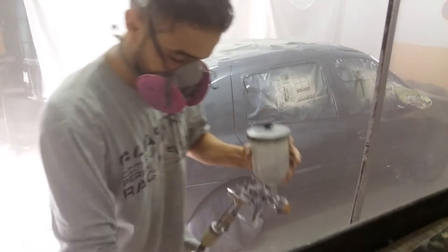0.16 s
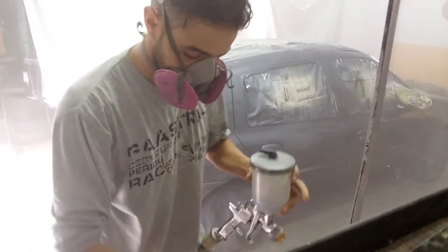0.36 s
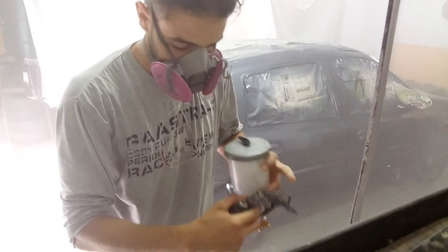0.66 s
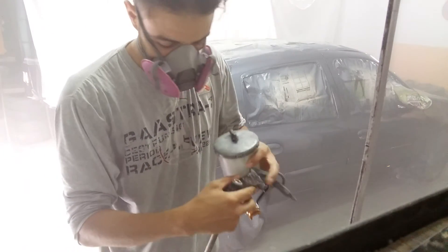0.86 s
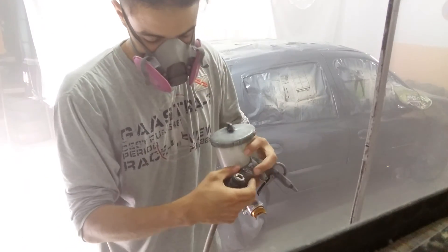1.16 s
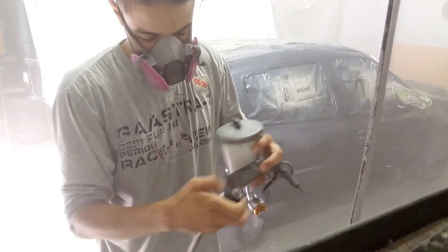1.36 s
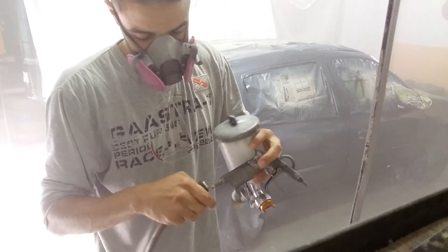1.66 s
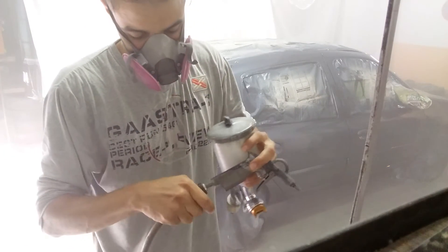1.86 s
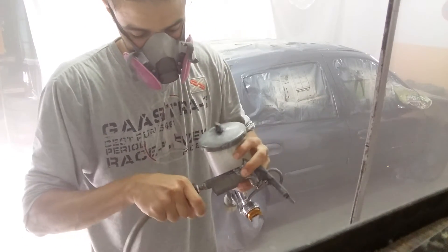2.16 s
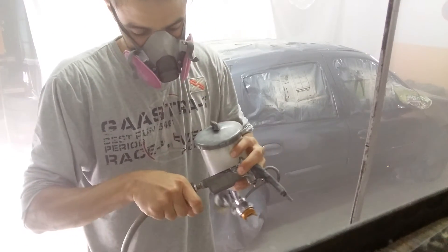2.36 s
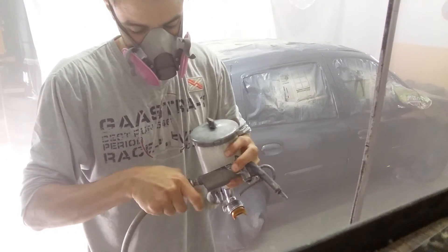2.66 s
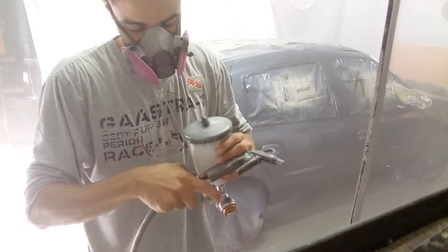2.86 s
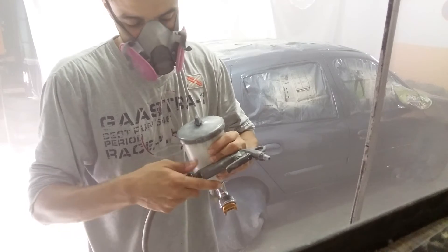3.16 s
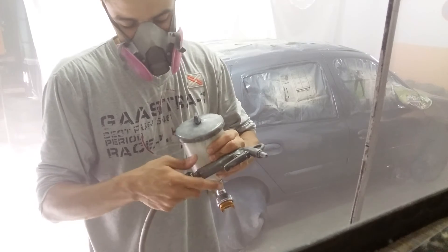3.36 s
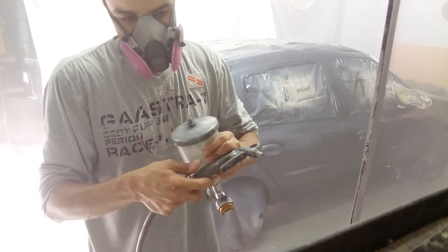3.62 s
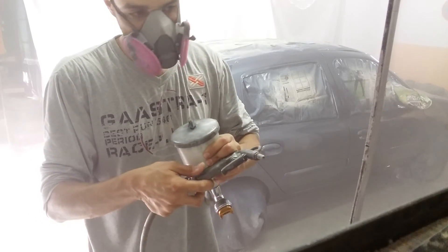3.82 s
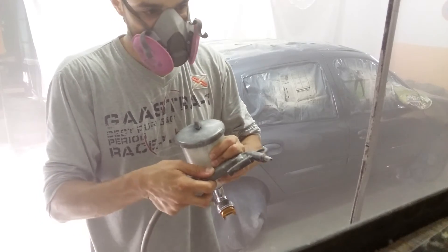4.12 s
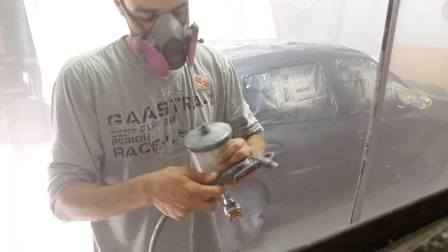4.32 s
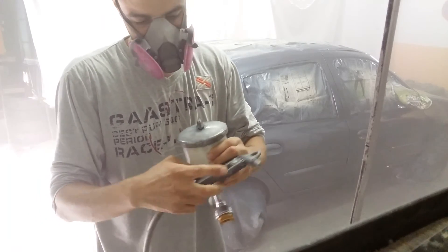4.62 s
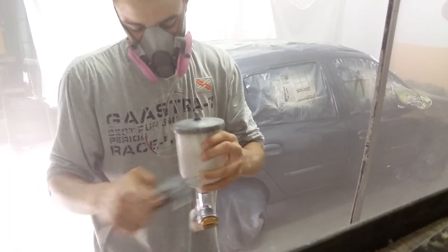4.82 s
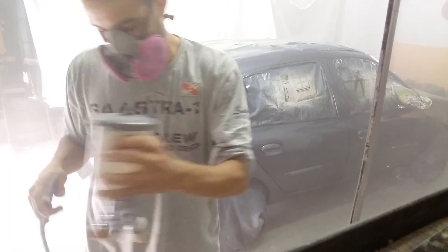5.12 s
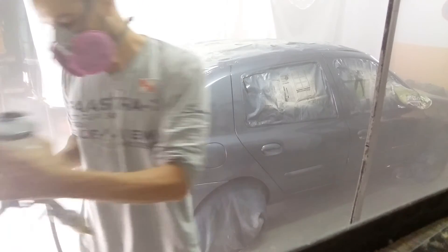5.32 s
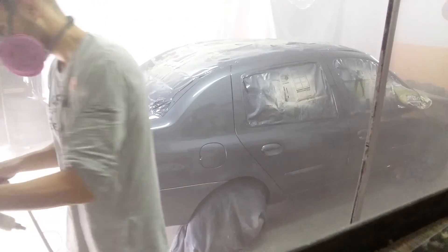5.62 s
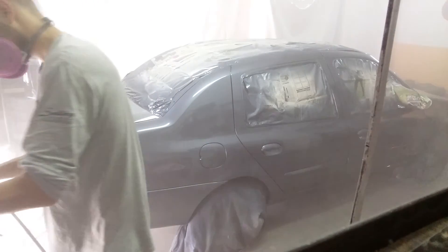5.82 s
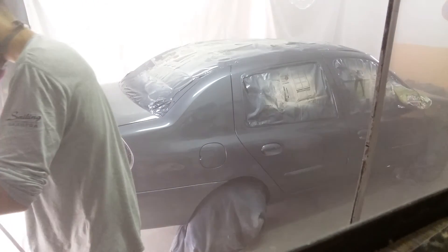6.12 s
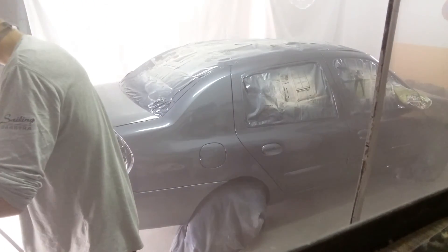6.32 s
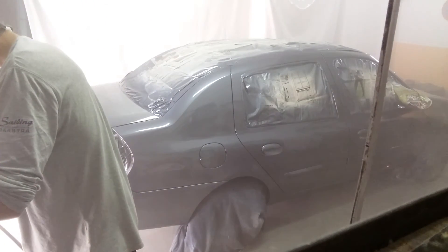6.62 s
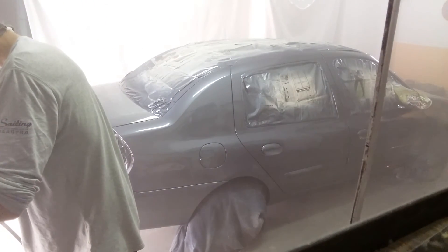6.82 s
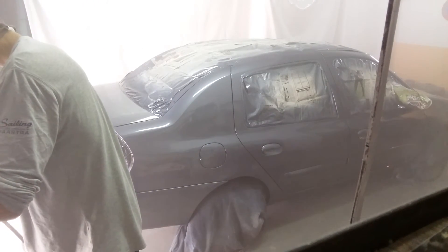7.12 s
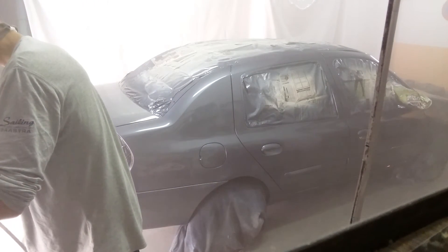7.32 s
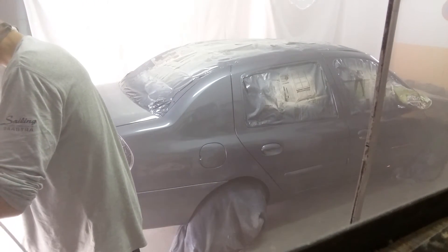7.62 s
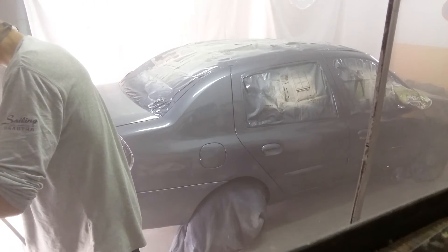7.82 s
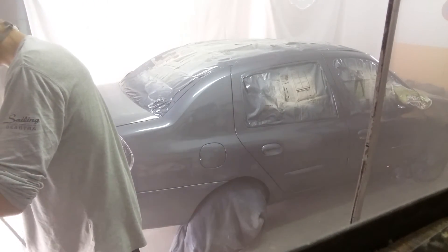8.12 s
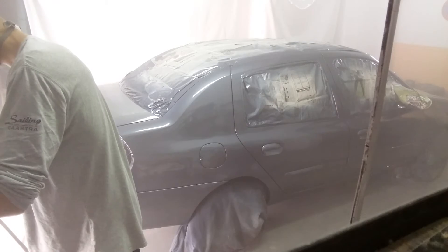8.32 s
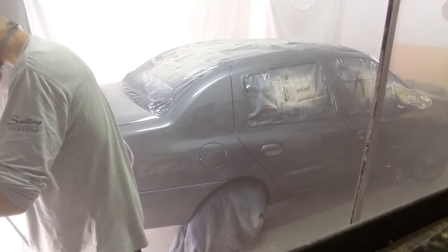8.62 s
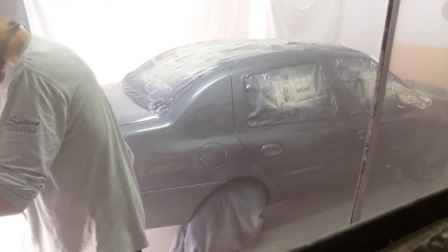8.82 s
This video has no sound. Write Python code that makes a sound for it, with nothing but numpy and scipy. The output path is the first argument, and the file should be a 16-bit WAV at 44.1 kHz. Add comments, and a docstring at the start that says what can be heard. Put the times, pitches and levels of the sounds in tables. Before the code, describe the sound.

Dull knocks, dry ticks and ringing metal couplings precede one short and two longer spray gun blasts in an echoing booth with a humming fan.

```python
"""A booth fan hums all along: duct-shaped noise, a beat each turn and tones on multiples of the shaft rate.
Over it come dull knocks and dry ticks (noise bursts, damped sines) and faint swells of air noise.
Hose fittings ring as decaying modes either side of a squeak, then the coupling snaps with a spurt of air.
After more puffs the spray gun blows one short and two longer blasts of fluttering noise, a low pop among them;
the fan sinks meanwhile. Hard walls echo all but the fan at a two-port microphone."""
import sys
import numpy as np
from scipy import signal
from scipy.fft import rfft, irfft, next_fast_len
from scipy.io import wavfile
from scipy.ndimage import uniform_filter1d

SR = 44100
rng = np.random.default_rng(int(sys.argv[2]) if len(sys.argv) > 2 else 0)


def waveform_to_disk(signal):
    """Save audio, clipped to [-1, 1], as 16-bit WAV at the path in sys.argv[1]."""
    frames = np.transpose(np.atleast_2d(signal))
    scaled = np.clip(frames, -1, 1) * 32767
    samples = np.round(scaled).astype(np.int16)
    wavfile.write(sys.argv[1], SR, samples)


def amplitude_ratio(level_db):
    """Convert a level in decibels to the matching linear amplitude (field) ratio."""
    exponent = np.asarray(level_db, float) / 20
    return 10 ** exponent


N = 395577
T = np.arange(N) / SR
SIDES = np.array([[.5], [-.5]])  # splits a left-minus-right level between the ports
# samples by which left trails right
FAN_LAG, GUN_LAG, RING_LAG, SNAP_LAG, TICK_LAG = -13, 19, 22, 7, 3
# trigger pulls: (valve opens [s], opening time [s], trigger let go [s], first sag after that [dB/s])
TRIGGER_PULLS = [(6.054, .0067, 6.14, 133), (6.271, .004, 7.998, 100), (8.193, .02, 8.86, 76)]
AIR_FROM = int(SR * TRIGGER_PULLS[0][0]) - SR // 50  # first sample of the blasts


def on_log(table, hz):
    """Read a (frequency [Hz], value) table on a log-frequency axis."""
    f, v = np.transpose(table)
    return np.interp(np.log(hz + 1), np.log(f + 1), v)


def shape(x, gain):
    """Filter by a function of frequency."""
    length = x.shape[-1]
    size = next_fast_len(length + SR // 10)
    spectrum = rfft(x, size) * gain(np.fft.rfftfreq(size, 1 / SR))
    return irfft(spectrum, size)[..., :length]


def humps(hz, peaks):
    """Resonances as bell-shaped lifts in dB."""
    return sum(db / (1 + (2 * (hz - f) / width) ** 2) for f, width, db in peaks)


def unit(x):
    """Scale to rms 1."""
    return x / np.sqrt(np.mean(x ** 2))


def walk(rate, size=N):
    """Random levels held 1 / rate s and slewed twice; spread near 1."""
    hold = int(SR / rate)
    steps = np.repeat(rng.standard_normal(size // hold + 1), hold)
    return 1.38 * uniform_filter1d(uniform_filter1d(steps, hold), hold)[:size]


def place(x, pan_db, lag):
    """One source at both ports, with a level and time difference."""
    early = np.pad(x, (0, abs(lag)))[:len(x)]
    late = np.pad(x, (abs(lag), 0))[:len(x)]
    ports = [late, early] if lag > 0 else [early, late]
    return np.array(ports) * amplitude_ratio(SIDES * pan_db)


def add(track, s, sound):
    """Mix a short sound in at time s."""
    i = int(s * SR)
    track[..., i:i + sound.shape[-1]] += sound[..., :N - i]


def scattered(size, alike, lag):
    """Noise at both ports: a share comes straight, the rest has bounced off nearby things and differs."""
    alike = np.clip(alike, 0, 1)
    straight = place(rng.standard_normal(size), 0, lag)
    return np.sqrt(alike) * straight + np.sqrt(1 - alike) * rng.standard_normal((2, size))


def sink_db():
    """Falling level in dB (0 or less): it sinks slowly once the air blows, then faster, to a floor."""
    slow_db_per_s, steep_from_s, steep_db_per_s, most_db = 1.5, 7.82, 30, 11
    slow = slow_db_per_s * np.maximum(T - TRIGGER_PULLS[0][0], 0)
    steep = steep_db_per_s * np.maximum(T - steep_from_s, 0)
    return -np.minimum(slow + steep, most_db)


def fan():
    """Air rushes through resonant ducts, a beat marks each turn and multiples of the shaft rate sing."""
    # air rush: (frequency [Hz], spectral level [dB])
    rush_colour = [(15, -42), (25, -17), (80, 1), (241, -5), (299, -15.5), (361, -7.5), (857, -3.5),
                   (929, -5.5), (1120, -6), (1390, -4), (1550, -7.5), (3050, -16), (5820, -24), (7030, -43),
                   (15800, -42)]
    # duct resonances: (frequency [Hz], width [Hz], lift [dB])
    ducts = [(60.4, 32, 4.8), (107, 7.8, 2.5), (152.7, 9.6, 7.7), (930, 100, 4.3), (1260, 23, 10.5),
             (1370, 30, 5.9), (1784, 49, 8), (2000, 21, 6.5), (2980, 300, 6.2)]
    # likeness of the ports: (frequency [Hz], likeness [0-1])
    likeness = [(30, 0.98), (100, 1), (250, 0.61), (500, 0.93), (1000, 0.1), (3000, 0.06), (8000, 0.2)]
    # balance of the rush: (frequency [Hz], left minus right [dB])
    balance = [(60, -1.5), (110, 1), (200, 2.5), (380, 0.5), (700, -1.5), (1290, 0), (2380, 1.5),
               (4400, -1), (8120, 13), (15000, -3)]
    # tones that sing: (multiple of the shaft rate)
    orders = [3, 4, 6, 16, 17, 24, 26, 36, 39, 42, 43, 50, 69, 75, 78, 97.5, 111]
    # their amplitudes before drift, sinking and pan: (level [dB])
    order_levels = [-57, -53.5, -57.5, -50.5, -54.5, -58, -61, -56, -58.5, -57, -58, -47.5, -50.5, -69, -46,
                    -52, -53.5]
    shaft_hz, rush_db = 18.43, -40.5
    turns = np.cumsum(shaft_hz * (1 + 0.000592 * walk(1.54))) / SR
    once_a_turn = np.diff(np.floor(turns), prepend=0)
    beat = unit(shape(once_a_turn, lambda f: 1 / (1 + (f / 2500) ** 4)))
    common = place(rng.standard_normal(N) + amplitude_ratio(-18.5) * beat, 0, FAN_LAG)
    own = rng.standard_normal((2, N))

    def alike(f):
        return np.clip(on_log(likeness, f), 0, 1)

    def colour(f):
        return amplitude_ratio(on_log(rush_colour, f) + humps(f, ducts) + SIDES * on_log(balance, f))

    rush = shape(common, lambda f: np.sqrt(alike(f))) + shape(own, lambda f: np.sqrt(1 - alike(f)))
    rush = unit(shape(rush, colour))
    tones = 0
    for order, db, phase in zip(orders, order_levels, rng.random(len(orders))):
        tones = tones + amplitude_ratio(db + 0.34 * walk(6)) * np.sin(2 * np.pi * (order * turns + phase))
    hum_db = sink_db()
    return amplitude_ratio(rush_db + hum_db) * rush + place(amplitude_ratio(1.14 * hum_db) * tones, 5.2, FAN_LAG)


def burst(hz, width, rise, t60):
    """A band of noise that rises and dies away; the lower, the more alike at both ports."""
    t = T[:int(SR * (rise + t60))]
    noise = shape(scattered(SR, 250 / hz, 0),
                  lambda f: 1 / (1 + ((f - hz ** 2 / (f + 1)) / width) ** 2) ** 1.07)
    noise = unit(noise)[:, :len(t)]
    return .5 * noise * np.minimum(t / rise, 1) ** 2 * amplitude_ratio(-60 * np.maximum(t - rise, 0) / t60)


def click(hz, cycles):
    """A hard contact: a sine that swells within one cycle and dies by e over the given cycles."""
    turn = hz * T[:SR // 2]
    return 2 * np.sin(2 * np.pi * turn) * np.exp(-turn / cycles) * (1 - np.exp(-2 * turn))


def handling():
    """Contacts as damped sines with noise for ticks, noise alone for knocks, and one low pop."""
    # dry ticks: (time [s], level [dB], click frequency [Hz], t60 of the noise [s], left minus right [dB])
    ticks = [(.3484, -39, 6000, .02, 6), (0.6228, -28.5, 2100, 0.036, 0), (0.8586, -24.5, 2700, 0.022, -1),
             (1.2377, -33.5, 3800, 0.012, 6)]
    # dull knocks and steps: (time [s], level [dB], centre [Hz], rise [s], t60 [s])
    knocks = [(0.101, -27.5, 94, 0.012, 0.24), (.225, -24.5, 620, 0.027, 0.27),
              (4.391, -35, 417, 0.0034, 0.11), (5.17, -32, 99, 0.055, 0.48), (5.682, -50, 140, .04, .3)]
    pop_s, pop_db, pop_hz = 7.3612, -8, 430
    out = np.zeros((2, N))
    for s, db, hz, t60, pan_db in ticks:
        add(out, s, place(amplitude_ratio(db) * click(hz, 1.6), pan_db, TICK_LAG))
        add(out, s, amplitude_ratio(db - 4.5) * burst(1.35 * hz, 0.69 * hz, 0.00015, t60))
    for s, db, hz, rise, t60 in knocks:
        add(out, s, amplitude_ratio(db) * burst(hz, 1.1 * hz, rise, t60))
    add(out, pop_s, -amplitude_ratio(pop_db) * click(pop_hz, 0.37))
    return out


def booth(x, level_db):
    """Dense wall echoes in octave bands, other ones at each port, with a decay time for each band."""
    # decay of the walls: (frequency [Hz], t60 [s])
    decay = [(250, 1), (1000, 0.9), (3000, 0.62), (7000, 0.79), (15000, 0.76)]
    t, echoes = T[:SR], 0
    for hz in 180 * 2 ** np.arange(7):
        band = shape(rng.standard_normal((2, SR)), lambda f: np.exp(-2 * np.log2((f + 1) / hz) ** 2))
        fade = amplitude_ratio(-60 * t / on_log(decay, hz)) * np.minimum(t / 0.0023, 1)
        echoes = echoes + band * fade / np.sqrt(np.sum(fade ** 2))
    return amplitude_ratio(level_db) * signal.fftconvolve(x, echoes, axes=1)[:, :N]


def housing(x):
    """The microphone housing shades each port differently across the spectrum."""
    # port balance: (frequency [Hz], left minus right [dB])
    balance = [(250, 1), (500, -2), (1000, 3.5), (1500, 2), (2400, -3), (4000, 1.5), (5500, 4), (8000, 8.5),
               (12000, 2.5), (15000, 2)]
    return shape(x, lambda f: amplitude_ratio(SIDES * on_log(balance, f)))


def puffs():
    """Soft leaks of air while the gun is handled: each swells to its peak and fades."""
    # puffs and rustle: (peak time [s], level before smoothing [dB], time to swell by rise_db [s])
    leaks = [(.344, -46, .01), (2.895, -42.5, 0.096), (4.57, -49, 0.1), (4.83, -55, .05),
             (5.166, -41, .045), (5.39, -48, .045), (5.6, -50, 0.12), (5.665, -36.5, .05),
             (5.851, -29, 0.035)]
    # colour of the leaking air: (frequency [Hz], spectral level [dB])
    colour = [(1200, -3.5), (2000, 4.5), (3000, 0.5), (4200, 0), (5500, -2.5), (7000, -13.5),
              (10000, -21.5), (15800, -47)]
    rise_db, fade_db_per_s = 23, 168
    gain = 0
    for s, db, rise in leaks:
        swell = rise_db * np.maximum(s - T, 0) / rise
        fade = fade_db_per_s * np.maximum(T - s, 0)
        gain = gain + amplitude_ratio(db - swell - fade)
    air = unit(shape(scattered(N, 0.13, GUN_LAG), lambda f: amplitude_ratio(on_log(colour, f))))
    return air * uniform_filter1d(gain, size=700) * amplitude_ratio(1.5 * walk(60))


def metal(hits, modes, crack_hz):
    """Each blow cracks and rings the part; the hand kills most of the ring at once, the rest rattles on."""
    out, t = np.zeros((2, N)), T[:SR // 2]
    for s, db, ring_db in hits:
        for hz, mode_db, t60, pan_db in modes:
            shake = amplitude_ratio(5.5 * np.array([walk(154, size=len(t)), walk(170, size=len(t))]))
            fade = amplitude_ratio(-60 * t / 0.017) + amplitude_ratio(ring_db - 60 * t / t60) * shake
            # loose parts touch and part, so the higher the mode the more its phase slips
            slip = hz / 6500 * walk(203, size=len(t))
            ring = np.sin(2 * np.pi * hz * t + slip) * np.minimum(t / 0.00027, 1)
            chance_db = 1.9 * rng.standard_normal()
            add(out, s, amplitude_ratio(db + mode_db + chance_db) * fade * place(ring, pan_db, RING_LAG))
        add(out, s, amplitude_ratio(db + 4) * burst(crack_hz, 0.67 * crack_hz, 0.0002, 0.032))
    return out


def sleeve():
    """Blows on the sliding sleeve excite its ringing modes."""
    # blows: (time [s], level [dB], rattling ring re damped ring [dB])
    blows = [(1.9458, -24.5, -11), (1.9842, -21, -19), (2.011, -41, -6)]
    # modes: (frequency [Hz], level re blow [dB], t60 of the rattling ring [s], left minus right [dB])
    modes = [(2510, 2.5, 0.058, 2), (3180, -3, .04, -6), (3700, -2, .04, 0), (3994, -2, 0.43, -8),
             (4130, -3, 0.16, -10), (5370, -4, 0.27, 13), (5900, -13, .15, 9), (7930, -22, .15, 8),
             (8495, -21, .12, 5), (10690, -23, .07, -2), (14100, -35, .2, 3)]
    return metal(blows, modes, 2560.0)


def squeak():
    """The sleeve slips on its seal: a short wavering chirp that drops, then climbs slightly."""
    start_s, length_s, level_db = 2.412, 0.053, -46.5
    from_hz, low_hz, drop_s, climb_hz_per_s = 5500, 3800, .006, 8800
    out, t = np.zeros((2, N)), T[:int(SR * length_s)]
    hz = low_hz + (from_hz - low_hz) * np.exp(-t / drop_s) + climb_hz_per_s * t
    pitch = hz * (1 + .012 * walk(310, size=len(t)))
    swell = .2 + np.sin(np.pi * (t / length_s) ** 1.3)
    gain = amplitude_ratio(level_db + 5.2 * walk(192, size=len(t))) * swell
    add(out, start_s, place(gain * np.sin(2 * np.pi * np.cumsum(pitch) / SR), -1.2, RING_LAG))
    return out


def nipple():
    """Blows on the hose nipple excite its ringing modes."""
    # blows: (time [s], level [dB], rattling ring re damped ring [dB])
    blows = [(2.868, -48, -20), (2.887, -44, -20), (2.909, -32.5, -8.5), (3.0042, -35, -22)]
    # modes: (frequency [Hz], level re blow [dB], t60 of the rattling ring [s], left minus right [dB])
    modes = [(4770, 1.5, 0.15, -13.5), (6900, -16.5, .08, 0), (7900, -19, 0.11, 3), (8750, -26, 0.22, 0),
             (10300, -25, .3, 0), (10710, -19, .3, 4), (12100, -26, .15, 0), (13915, -25, .12, 2)]
    return metal(blows, modes, 4500.0)


def snap():
    """The coupling locks with a crack and a spurt of trapped air that thins out."""
    # colour of the spurt: (frequency [Hz], spectral level [dB])
    colour = [(900, -30), (1240, -2.5), (1900, -2), (2600, 5), (3400, -2.5), (5500, -7.5), (7250, -19),
              (9200, -22), (15800, -45)]
    snap_s, snap_db = 4.1312, -10
    out, t = np.zeros((2, N)), T[:SR // 2]
    spurt = unit(shape(scattered(len(t), 0.23, SNAP_LAG), lambda f: amplitude_ratio(on_log(colour, f))))
    fade = amplitude_ratio(-2.5 - 60 * t / 0.031) + amplitude_ratio(-18.5 - 60 * t / .5)
    spurt = spurt * fade * np.minimum(t / 0.00067, 1)
    crack = 0.5 * click(2480.0, 6.1) + 0.2 * click(1280.0, 3.3) + 0.3 * click(3700.0, 5.5)
    add(out, snap_s, amplitude_ratio(snap_db) * (spurt + place(crack, -.6, SNAP_LAG)))
    return out


def pull_flow(t, pull, sweep):
    """Flow of one pull: the valve opens in ms, pent-up air surges out first, then the flow sags on release."""
    opens, over, shuts, sag = pull
    surge_db, surge_s = 0.8, 0.025
    sag_curb_s = .3  # the sag slows as the pressure in the gun evens out
    valve = np.clip((t - opens) / over + .5, 0, 1)
    surge = surge_db * np.exp(-np.abs(t - opens) / surge_s)
    aim_db = np.interp(t, *np.transpose(sweep)[:2])
    sagged = sag * sag_curb_s * (1 - np.exp(-np.maximum(t - shuts, 0) / sag_curb_s))
    last_fade = 40 * np.maximum(t - shuts - .2, 0)
    return valve * amplitude_ratio(surge + aim_db - sagged - last_fade)


def jet():
    """Turbulent air from the nozzle; the aim sets the colour and each part of the hiss flutters."""
    # colour of the jet: (frequency [Hz], spectral level [dB])
    colour = [(150, -15.5), (250, -19), (386, -7.5), (585, -12.5), (1190, -8.5), (1300, -9), (1600, -13),
              (2000, -4), (2260, -10.5), (2840, -7), (3370, -7.5), (4080, -8.5), (5980, -5.5),
              (7110, -12.5), (15800, -17)]
    # nozzle resonances: (frequency [Hz], width [Hz], strength before compression [dB])
    nozzle = [(2040, 190, -17), (3050, 260, -11.5), (4055, 370, 15.5), (5020, 72, -21), (5340, 110, -1)]
    # borders of the six parts of the hiss: (frequency [Hz])
    part_edges = [600, 1450, 3250, 4700, 7700]
    # rumble, roar, mid hiss, nozzle band, jet, fizz: (level re jet [dB],
    # change per wash [dB/dB], per whistle [dB/dB], per sink_db [dB/dB])
    parts = [(-11, 1.37, .01, 1.3), (-2.5, 1, .01, 0.23), (2.5, 0.71, 0.45, 0.0083),
             (0.5, 0.18, 0.97, 0.0033), (-0.2, 0, .01, 0.026), (-1.5, 0.13, 0.06, .1)]
    # the hand sweeps the gun, a table each pull: (time [s], jet level [dB],
    # wash re jet: how hard the air scrubs the surface [dB], nozzle whistle re jet [dB])
    sweeps = [
        [(6.07, -23.5, -8.5, 3.5), (6.136, -22.5, -9, -1), (6.14, -25, -3.5, 1)],
        [(6.28, -23.5, -9, 3), (6.374, -22.5, -7, -0.5), (6.422, -24, -2, 3), (6.556, -20.5, -10.5, -3),
         (6.754, -21, -6.5, -7), (6.768, -17.5, -11, -8), (6.858, -21.5, -6.5, -6), (6.922, -19.5, -22.5, -8.5),
         (7.026, -19, -13.5, 1), (7.046, -22.5, -6.5, -3), (7.232, -17, -22.5, -7), (7.39, -23, -8, 0),
         (7.4, -20, -17, -6), (7.568, -21, -7, 2), (7.592, -21, -11, 4.5), (7.73, -26, -9, 2),
         (7.754, -35, -11.5, 5), (7.764, -20.5, -17, 2), (7.832, -25, -7, 0), (7.864, -20.5, -16, -3),
         (7.88, -23, -19, 8), (7.912, -23, -13, -2), (7.936, -24.5, -8.5, 0.5), (8.0, -17.5, -25, -5)],
        [(8.2, -20, -10, -7), (8.208, -19, -13, 1.5), (8.3, -26, -3.5, -1), (8.432, -19, -10.5, 1),
         (8.482, -22, -5, -0.5), (8.808, -22, -9.5, -7), (8.814, -21.5, -16, -3), (8.86, -21.5, -9.5, -5.5)],
    ]
    pan_per_wash = -0.27  # left minus right, dB per dB: the gun turns right to face the work
    t = T[AIR_FROM:]
    top_db = max(db for *_, db in nozzle)
    lifts = [(hz, width, 6.5 + 0.21 * (db - top_db)) for hz, width, db in nozzle]
    hiss = shape(scattered(len(t), 0.32, GUN_LAG), lambda f: amplitude_ratio(on_log(colour, f) + humps(f, lifts)))
    flow = np.max([pull_flow(t, pull, sweep) for pull, sweep in zip(TRIGGER_PULLS, sweeps)], axis=0)
    s, _, wash_db, whistle_db = np.transpose(np.concatenate(sweeps))
    wash_db, whistle_db = np.interp(t, s, wash_db), np.interp(t, s, whistle_db)
    sunk_db = sink_db()[AIR_FROM:]
    gust, out = walk(22, size=len(t)), 0  # all parts share the gust
    edges = [0, *part_edges, SR]
    for lo, hi, (db, per_wash, per_whistle, per_sink) in zip(edges, edges[1:], parts):
        part = unit(shape(hiss, lambda f: 1 / np.sqrt((1 + (lo / (f + 1)) ** 12) * (1 + (f / hi) ** 12))))
        flutter_db = 1.0 * gust + 1.5 * walk(30, size=len(t)) + 1.6 * walk(400, size=len(t))
        aim_db = per_wash * wash_db + per_whistle * whistle_db
        out = out + part * amplitude_ratio(db + aim_db + per_sink * sunk_db + flutter_db)
    out = out * flow * amplitude_ratio(SIDES * (pan_per_wash * wash_db - 2.5))
    return np.pad(out, ((0, 0), (AIR_FROM, 0)))


def patchy(x):
    """As the fan sinks, low bands of the whole mix drop out for moments."""
    # centres of the bands that drop out: (frequency [Hz])
    centres = [110, 170, 260, 390]
    depth = 1.3  # dB lost per dB sunk and unit of the random walks
    late, sunk_db = x[:, AIR_FROM:], sink_db()[AIR_FROM:]
    shared, lost = walk(9, size=len(sunk_db)), 0
    for hz in centres:
        band = shape(late, lambda f: np.exp(-6 * np.log2((f + 1) / hz) ** 2))
        dip = np.maximum(shared + walk(11, size=len(sunk_db)), 0)
        lost = lost + .86 * band * (1 - amplitude_ratio(depth * sunk_db * dip))
    return x - np.pad(lost, ((0, 0), (AIR_FROM, 0)))


def scene():
    """Near sounds reach the ports directly and again from the walls; the fan has no added echo."""
    air = jet() + puffs()
    rings = sleeve() + squeak() + nipple()
    blows = snap() + handling()
    to_walls = amplitude_ratio(-1.34) * air + amplitude_ratio(-5) * rings + amplitude_ratio(-3) * blows
    wet = booth(to_walls.mean(axis=0, keepdims=True), -0.28)
    return patchy(housing(amplitude_ratio(-2.0) * air + wet) + amplitude_ratio(-1.2) * rings + blows + fan())


def band_limit(x):
    """A steep low-pass at the top of the band."""
    return signal.sosfilt(signal.butter(12, 16600, fs=SR, output="sos"), x)


def record(dry):
    """The microphone drops the deepest bass, rounds the loudest peaks and cuts the top."""
    thin = signal.sosfilt(signal.butter(2, 32., "high", fs=SR, output="sos"), dry)
    rounded = .9 * np.tanh(thin / .9)
    top_cut = signal.ellip(10, .2, 70, 15850, fs=SR, output="sos")
    finished = signal.sosfilt(top_cut, rounded)
    return band_limit(finished)


dry = scene()
out = record(dry)
waveform_to_disk(out)
```